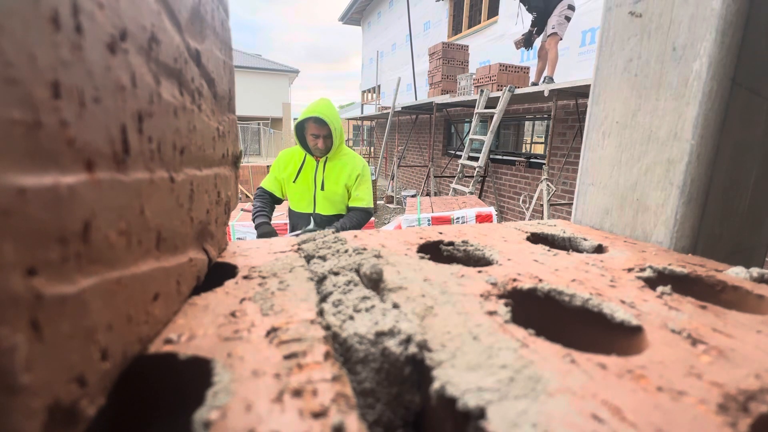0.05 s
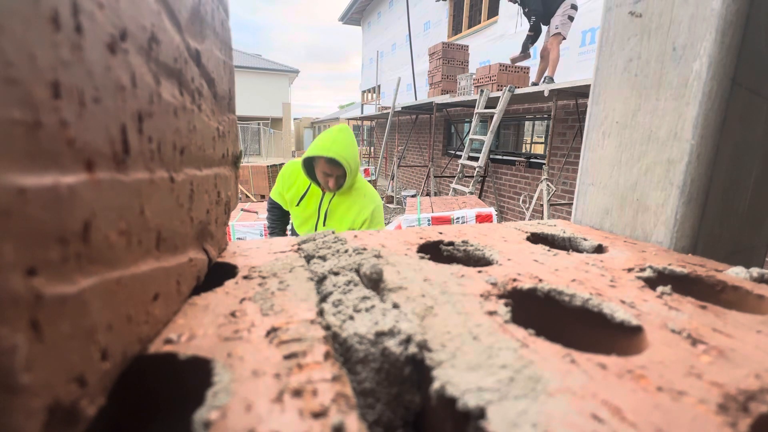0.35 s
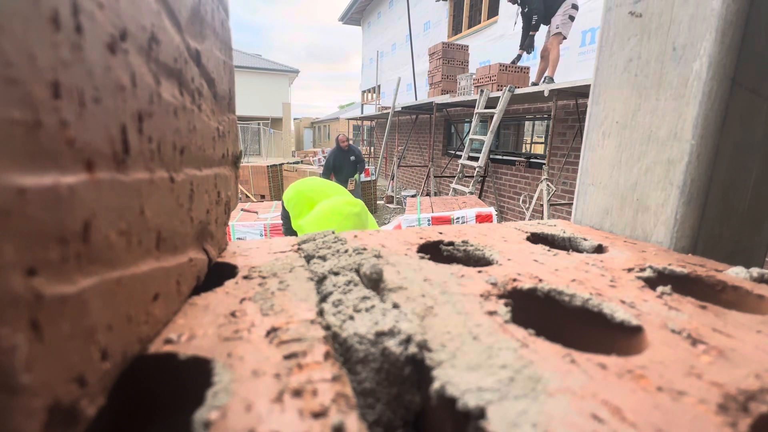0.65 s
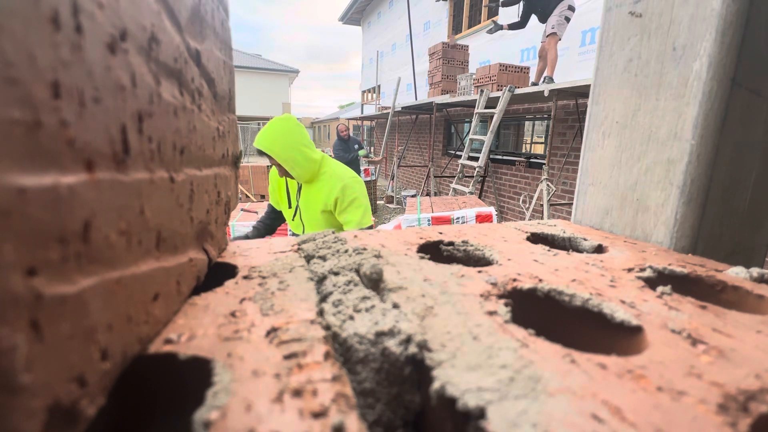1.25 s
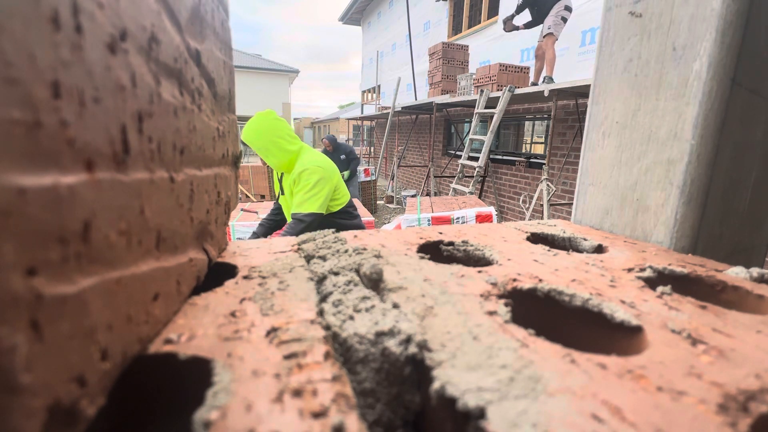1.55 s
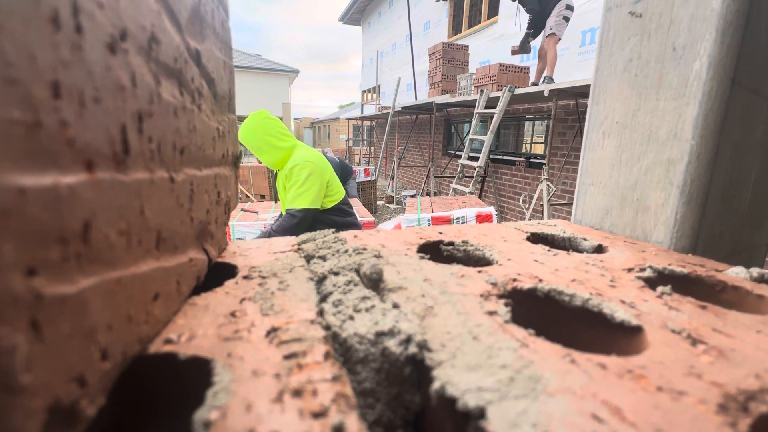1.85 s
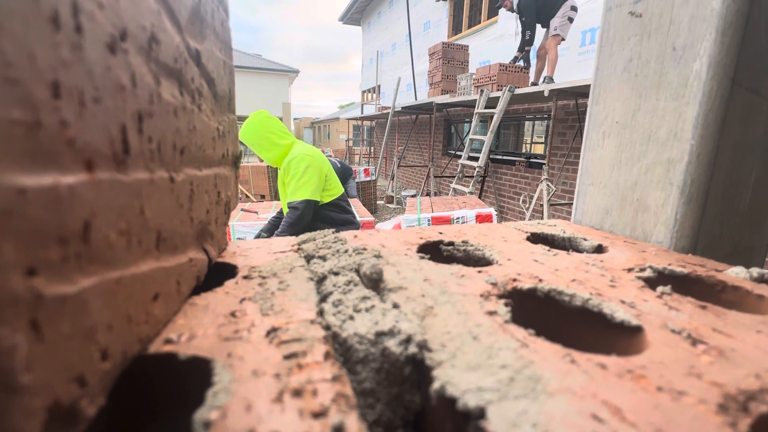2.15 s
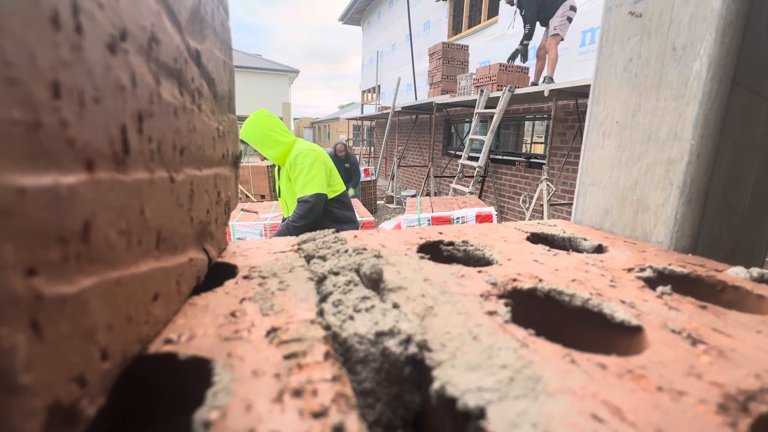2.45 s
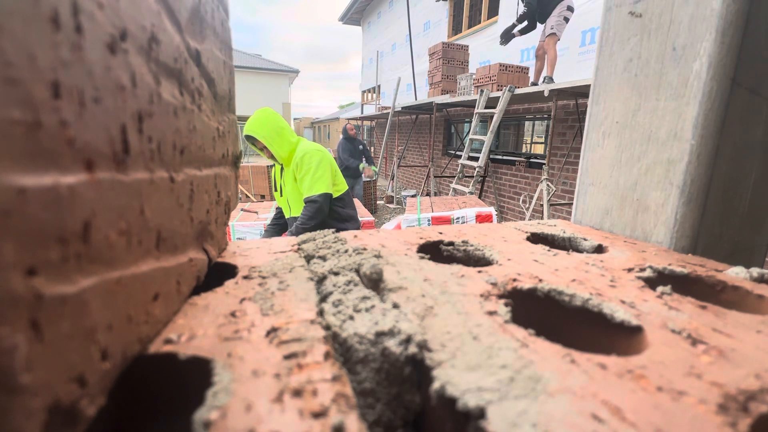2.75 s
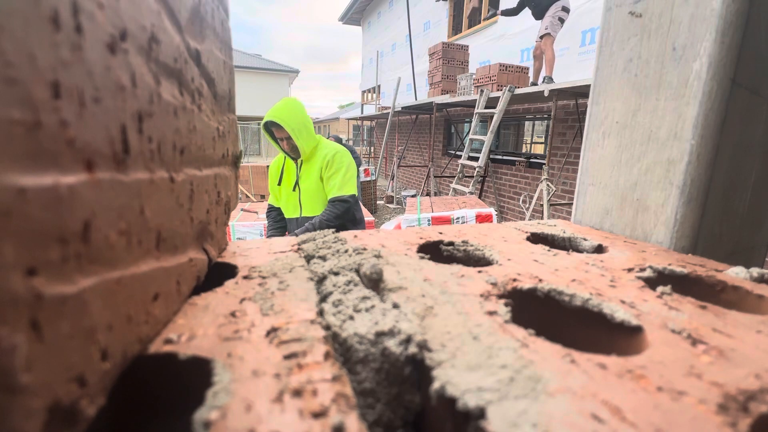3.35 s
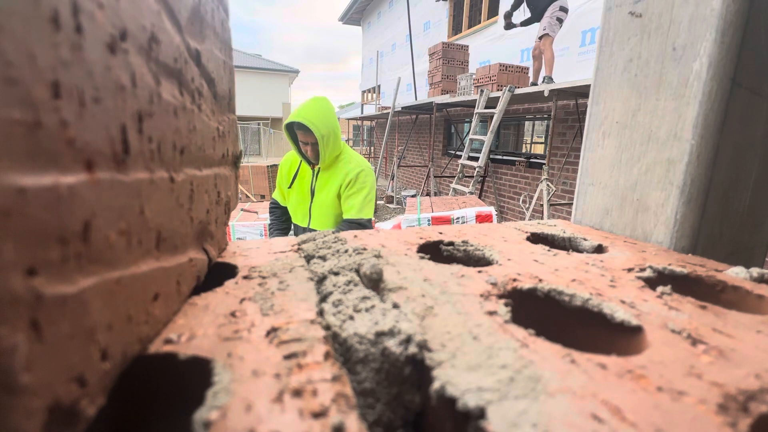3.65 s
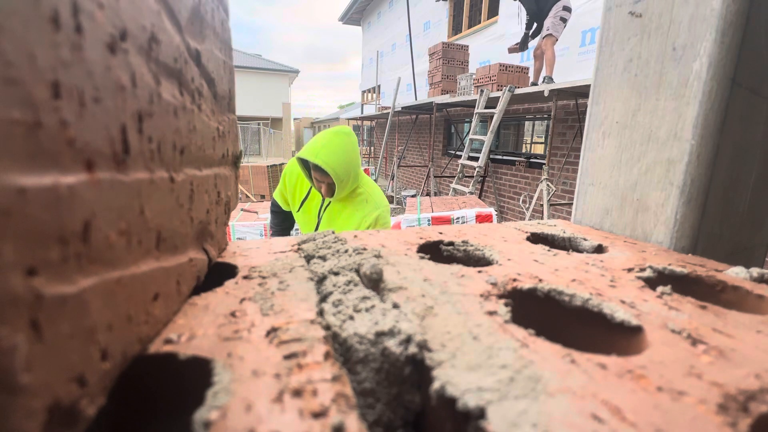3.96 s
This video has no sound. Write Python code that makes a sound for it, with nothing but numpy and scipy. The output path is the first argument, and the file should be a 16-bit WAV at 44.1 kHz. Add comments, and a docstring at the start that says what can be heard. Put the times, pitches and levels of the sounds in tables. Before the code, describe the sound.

Bricklaying sounds at a building site, over a distant mixer's hum. A steel tube rings at the start; around 0.7 seconds tools clatter, bricks bump and mortar crumbs tick. A trowel chops into mortar with hollow plops at 1.4, 1.9 and 2.5 seconds, scraping grittily between and chinking at 2.2. The hum fades, and two dull brick knocks land at 3.0 and 3.5 seconds, echoing briefly off the walls.

```python
"""Bricklaying, heard from a phone lying on a stack of bricks. Over a distant mixer's hum a steel tube
rings out and tools clatter; loose bricks bump and mortar crumbs tick. From 1.4 s a trowel chops into
mortar three times with hollow, falling plops, scraping through the sand in between and once chinking on
a brick. After 3 s, as the background sinks, two bricks are knocked down with damped, sagging notes.
The house walls answer each chop and knock with reverberation."""
import sys
import numpy as np
from scipy import signal
from scipy.fft import rfft, irfft
from scipy.io import wavfile
from scipy.ndimage import uniform_filter1d

SR = 44100
rng = np.random.default_rng(int(sys.argv[2]) if len(sys.argv) > 2 else 0)


def inscribe(sig):
    """Save sig as 16-bit PCM at rate SR to the path in sys.argv[1].

    A 1-D sig is mono; a 2-D sig holds one channel per row.
    Samples are clipped to [-1, 1] before scaling.
    """
    pcm = np.round(np.clip(np.atleast_2d(sig).T, -1, 1) * 32767)
    wavfile.write(sys.argv[1], SR, pcm.astype(np.int16))


N = 176400
T = np.arange(N) / SR
LEFT_LAG_S = 0.000677  # sound reaches the left microphone port late
PORT_LAGS_S = np.array([[LEFT_LAG_S], [0]])


def amp(db):
    """Amplitude ratio of a level in decibels."""
    return 10 ** (np.asarray(db) / 20)


def unit_rms(x):
    """Normalisation to unit mean power."""
    return x / np.sqrt(np.mean(x ** 2))


def on_log(points, hz):
    """Interpolation of (f/Hz, value) points on a logarithmic frequency axis."""
    f, values = np.array(points, float).T
    return np.interp(np.log(hz + 1), np.log(f), values)


def on_time(points):
    """Linear interpolation of (t/s, value) points over the scene."""
    return np.interp(T, *np.array(points).T)


def wander(rate_hz, size):
    """Low-pass noise: a smooth random fluctuation of unit rms."""
    span = max(int(SR / rate_hz), 1)
    return unit_rms(uniform_filter1d(uniform_filter1d(rng.standard_normal(size), span), span))


def decay(t, t60):
    """Exponential damping by 60 dB in t60 seconds."""
    return np.exp(-np.log(1000) * t / t60)


def pan(db):
    """Stereo gains for a level difference, left over right."""
    return amp(np.array([[db], [-db]]) / 2)


def add(out, start, sound):
    """Superposition of a sound from a start time in seconds."""
    i = max(int(start * SR), 0)
    out[:, i:i + sound.shape[1]] += sound[:, :N - i]


# resonances and notches of the hollows in the brick stack: f/Hz, width/Hz, gain/dB
HOLLOWS = [(160, 28, 2), (349.3, 6.9, 3), (442, 54, 4), (530, 33.4, 6), (562, 24.5, 6.5), (742.5, 30, 5),
           (1168, 7.3, -1.5), (1360, 20, 12.5), (1442, 37, 6.5), (1551, 120, 6.5), (1730, 13, 11),
           (2427, 20, 8.5), (2935, 4.3, -1.5), (3500, 6.9, -21)]
# likeness of left and right: f/Hz, coherence
COHERENCE = [(40, 0.21), (150, 0.53), (330, 0.65), (600, 0.58), (1500, 0.22), (4000, 0.034), (12000, 0.055)]
def noise(spectrum, size, lag=LEFT_LAG_S):
    """Partly coherent stereo noise of unit rms, coloured by cavity resonance among the bricks."""
    hz = np.fft.rfftfreq(size, 1 / SR)
    hollows_db = sum(db / (1 + (2 * (hz - f) / width) ** 2) for f, width, db in HOLLOWS)
    mid, side = rfft(rng.standard_normal((2, size))) * amp(on_log(spectrum, hz) + hollows_db)
    coherence = on_log(COHERENCE, hz)
    mid, side = mid * np.sqrt(1 + coherence), side * np.sqrt(1 - coherence)
    left = (mid + side) * np.exp(-2j * np.pi * hz * lag)
    return unit_rms(irfft(np.array([left, mid - side]), size))


def ringing(modes, roughness):
    """Free vibration in damped modes, each amplitude-modulated as the struck object chatters."""
    t, out = T[:SR], 0
    for hz, db, t60 in modes:
        flutter = 1 + roughness * np.array([wander(110, SR) for _ in range(2)])
        phase = 2 * np.pi * (hz * t + rng.random((2, 1)) / 3)
        out = out + amp(db) * flutter * np.sin(phase) * decay(t, t60)
    return out * np.minimum(t / 0.003, 1)


# spectra of the mixer's churning, its hum lines and the rumble: f/Hz, relative level/dB
CHURN_SPECTRUM = [(25, -21), (54, -37), (125, -6), (190, -4), (280, -0.5), (430, -1), (720, -3.5),
                  (1100, -14), (1450, -16), (1900, -16.5), (2500, -19), (7000, -34.5), (13000, -54),
                  (14500, -68), (16000, -83)]
HUM_LINES = [(62, -25), (124, -12.5), (184, -18), (248, -16.5), (312, -20)]
RUMBLE_SPECTRUM = [(20, -12), (40, -10), (62, 15.5), (90, 7), (150, 3), (400, -42.5)]
# envelopes of the mixer and the rumble: t/s, relative level/dB
MIXER_LEVEL = [(0, -36.5), (.55, -38), (1.0, -36.5), (1.3, -38), (1.6, -34.5), (2.1, -34), (2.5, -38.5),
               (2.95, -47), (3.35, -48), (3.75, -51), (4.0, -53)]
RUMBLE_LEVEL = [(0, 15.5), (1.2, 10), (1.5, -21), (2.0, 5.5), (2.8, 8.5), (3.3, 2), (4.0, 7.5)]
def mixer():
    """Machine noise: a near-harmonic line spectrum on broadband churning, over a low rumble."""
    churn = noise(CHURN_SPECTRUM, N) * amp(1.3 * wander(20, N))
    hum = 0
    for hz, db in HUM_LINES:
        amplitude = np.sqrt(2) * amp(db + 0.51 * wander(23, N))
        drifting_time = np.cumsum(1 + 0.0076 * wander(14.5, N)) / SR
        hum = hum + amplitude * np.sin(2 * np.pi * hz * (drifting_time - PORT_LAGS_S))
    rumble = np.array([noise(RUMBLE_SPECTRUM, N)[0] for _ in range(2)])
    rumble *= amp(-56.5 + on_time(RUMBLE_LEVEL) + wander(1.2, N))
    return ((churn + hum) * amp(on_time(MIXER_LEVEL)) + rumble) * pan(-3.5)


# spectrum of dry sand: f/Hz, relative level/dB
SAND_SPECTRUM = [(2000, -18), (6000, 5), (9500, -8), (12500, -4), (13600, -3), (14600, -24), (16000, -36)]
# envelope of its rustle: t/s, level/dB
SAND_LEVEL = [(0, -60), (.35, -72), (.55, -74), (.65, -59), (.68, -56), (.74, -58), (.85, -69), (.92, -62),
              (1.02, -73), (1.14, -58), (1.3, -79), (2.7, -82), (2.9, -65), (3.3, -85), (4.0, -90)]
def sand():
    """Randomly modulated noise: dry sand rustles faintly near the phone."""
    return noise(SAND_SPECTRUM, N) * amp(on_time(SAND_LEVEL) + 3 * wander(45, N))


# falling mortar crumbs: t/s, level/dB
CRUMBS = [(0.636, -42), (0.671, -36), (0.730, -48), (0.919, -51), (1.047, -50), (1.123, -40.5)]
# spectrum of one tick: f/Hz, relative level/dB
CRUMB_SPECTRUM = [(2000, 5), (6000, -1), (12500, -2), (14000, 1), (14800, -12), (16000, -27)]
def crumbs():
    """Brief impacts have broad spectra: dry mortar ticks on brick, leaving a faint tail."""
    out, t = np.zeros((2, N)), T[:SR // 4]
    envelope = np.exp(-t / 0.0028) + amp(-15.5) * np.exp(-t / 0.11)
    for at, db in CRUMBS:
        add(out, at, amp(db) * noise(CRUMB_SPECTRUM, len(t)) * envelope)
    return out


WALL_DELAY_S, ECHO_PAN_DB, EARLY_SHARE, EARLY_S = 0.0125, -1.7, 0.48, 0.026
BASS_HZ, MIDS_HZ, TREBLE_HZ = 257, 1720, 2300
# spectrum of the wall reflections: f/Hz, relative level/dB
WALL_SPECTRUM = [(40, -33), (110, -21.5), (200, -9.5), (260, -3.5), (350, 2), (540, 1), (740, 0.5),
                 (980, -10.5), (1400, -17), (1800, -15), (2300, -22), (3000, -25), (4500, -30.5),
                 (6500, -36), (9000, -45), (13000, -59.5), (14500, -56), (16000, -72)]
# reverberation time by band: f/Hz, T60/s
WALL_T60 = [(150, 0.95), (500, 0.61), (1500, 0.56), (5000, 0.54), (12000, 0.37)]
def wall_echo(bass_db, mids_db, treble_db, rise, hold):
    """Reverberation: dense reflections fall quickly at first, then dull as the treble dies sooner."""
    t, hz = T[:SR], np.fft.rfftfreq(SR, 1 / SR)
    low_shelf = bass_db / (1 + (hz / BASS_HZ) ** 4)
    mid_bell = mids_db / (1 + (np.log2((hz + 1) / MIDS_HZ) / 1.52) ** 4)
    high_shelf = treble_db * hz ** 2 / (hz ** 2 + TREBLE_HZ ** 2)
    spectrum = rfft(noise(WALL_SPECTRUM, SR)) * amp(low_shelf + mid_bell + high_shelf)
    age, tail = np.maximum(t - rise - hold, 0), 0
    centres, t60s = np.array(WALL_T60).T
    for share, t60 in zip(np.eye(len(centres)), t60s):
        band = irfft(spectrum * on_log(list(zip(centres, share)), hz), SR)
        tail = tail + band * decay(age, t60)
    early_fall = 1 - EARLY_SHARE + EARLY_SHARE * np.exp(-age / EARLY_S)
    onset_grain = np.exp(0.044 * wander(220, SR) * np.exp(-t / 0.018))
    return tail * np.minimum(t / rise, 1) * early_fall * onset_grain


# distant blows: t/s, level/dB, bass/dB, mids/dB, treble/dB, rise/s, hold/s, pan/dB
CLATTER = [(0.0, -27, -24, 0.5, 12, 0.00073, 0.07, -0.5), (0.47, -27, -9, -5, 2, 0.0033, 0.0026, -3.5),
           (.635, -20.5, -17, -10, 0.5, 0.016, 0.011, -1),
           (0.665, -11.5, -21, -1, -1.5, 0.0026, 0.0051, -0.5),
           (.682, -11, -8.5, 2, -13.5, 0.014, 0.04, -3.5), (1.047, -28, 3, -2, 9, 0.0013, 0.0019, -2.5),
           (1.124, -41, -7, -2, 30.5, 0.0035, 0.014, -3.5), (2.206, -18.5, 9.5, 1, 3, 0.014, 0.028, -2),
           (2.392, -26.5, -2.5, 1, -39, 0.018, 0.029, 1), (2.659, -36.5, 21, 3.5, 8.5, 0.013, 0.075, -1),
           (3.418, -42, 2, 4, 11, 0.0046, 0.07, -5)]
def clatter():
    """Indirect sound: bricks and tools handled out of sight arrive by reflection off the walls."""
    out = np.zeros((2, N))
    for at, db, *tone_db, rise, hold, pan_db in CLATTER:
        add(out, at, amp(db) * wall_echo(*tone_db, rise, hold) * pan(pan_db))
    return out


# modes of a steel tube, and of the trowel tapping a brick: f/Hz, relative level/dB, T60/s
TUBE_MODES = [(510, 3, 0.4), (540, -2.5, 0.66), (790, -3, 0.38), (1060, -23, 0.37), (1378, -18, 1),
              (1625, -16.5, 1), (2090, -15.5, 0.47), (2470, -22.5, 0.82), (3220, -21.5, .8),
              (4320, -22, 0.4), (4414, -29, 0.77)]
CHINK_MODES = [(2040, -2, .06), (2330, -6, .09), (2519, -10, .2), (2730, -5, .16), (2794, 0, .22),
               (2860, -4, .17)]
def clinks():
    """Modal ringing of struck steel: a tube, then the trowel, which skids off in a falling chirp."""
    out, t = np.zeros((2, N)), T[:SR]
    add(out, 0, amp(-24.5) * ringing(TUBE_MODES, roughness=0.089) * pan(1.7))
    start_hz, end_hz, glide_s = 2190, 986, 0.016
    hz = end_hz + (start_hz - end_hz) * np.exp(-(t / glide_s) ** 2)
    envelope = np.minimum(t / 0.003, 1) * np.exp(-(t / glide_s / 2) ** 2)
    chirp = np.sin(2 * np.pi * np.cumsum(hz) / SR) * envelope
    add(out, 2.203, amp(-29.5) * ringing(CHINK_MODES, roughness=0.6) + amp(-33) * chirp)
    return out


# collisions of loose bricks: t/s, level/dB, f/Hz
BUMPS = [(0.678, -11, 696), (0.698, -1, 506), (0.722, -7, 430), (0.757, -10, 531), (0.840, -23, 450)]
def bumps():
    """Heavy damping: bricks bump as they are picked up, in short notes with an inharmonic overtone."""
    out, t = np.zeros((2, N)), np.maximum(T[:SR // 4] - PORT_LAGS_S, 0)
    envelope = np.minimum(t / 0.0025, 1) * np.exp(-t / 0.01)
    for at, db, hz in BUMPS:
        phase = 2 * np.pi * hz * t
        note = np.sin(phase) + amp(-21) * np.sin(3.3 * phase)
        add(out, at, amp(db) * note * envelope * pan(1.5))
    return out


GRAINS_PER_S, GAP_WIDTH_HZ = 900, 59
# resonances of the blade: f/Hz, width/Hz, relative level/dB
BLADE_MODES = [(1340, 84, -18), (1550, 29, 1.5), (2030, 100, 7.5), (2290, 32, 1.5), (2840, 21, -2.5),
               (3135, 28, -3), (3410, 27, -3), (3700, 22, -6), (4940, 67, -10), (5800, 56, -5)]
# resonance of the gap under the blade, sinking as each push loads it: t/s, f/Hz
GAP_PITCH = [(1.70, 1420), (1.75, 1570), (1.80, 1335), (1.848, 1490), (1.89, 1320), (1.91, 1220),
             (2.1, 1495)]
def rasp():
    """Impulse excitation: sand grains ring the blade's fixed resonances and the gap's moving one."""
    grains = (rng.random(N) < GRAINS_PER_S / SR) * rng.uniform(-0.93, 1, (3, N))
    grains = grains[:2] + grains[2]  # the third row is common to both channels
    t = T[:SR // 20]
    response = sum(amp(db) * np.sin(2 * np.pi * hz * t) * np.exp(-np.pi * width * t)
                   for hz, width, db in BLADE_MODES)
    blade = signal.fftconvolve(grains, response[None], axes=1)[:, :N]
    # a one-pole filter in a rotating frame is a resonator of moving pitch
    rotation = np.exp(2j * np.pi * np.cumsum(on_time(GAP_PITCH)) / SR)
    pole = np.exp(-np.pi * GAP_WIDTH_HZ / SR)
    gap = (rotation * signal.lfilter([1], [1, -pole], grains / rotation)).imag
    return amp(-3.5) * unit_rms(blade) + amp(-4.5) * unit_rms(gap)


# a long stroke, then a light sandy one: t/s, body level/dB, rasp level/dB, hiss level/dB
STROKES = [(1.59, -64, -74, -72), (1.628, -38, -71, -47), (1.668, -29.5, -40.5, -39.5),
           (1.732, -26, -33.5, -32.5), (1.748, -36, -31, -32), (1.776, -35, -42, -29.5),
           (1.794, -24, -30, -31), (1.848, -31, -25.5, -37), (1.862, -23, -31, -38),
           (1.891, -25, -27.5, -41), (1.901, -22.5, -34, -45), (1.912, -21, -20.5, -46),
           (1.925, -59, -64, -63), (2.11, -76, -66, -78), (2.16, -38, -50, -51), (2.21, -39, -38, -45),
           (2.3, -51, -57, -45.5), (2.4, -50, -71, -57), (2.45, -63, -70, -55.5), (2.5, -72, -73, -63)]
# spectra of the blade's body and the gritty hiss: f/Hz, relative level/dB
BODY_SPECTRUM = [(100, 1.5), (300, 3.5), (500, 4.5), (750, 7.5), (1000, -5), (1450, -9.5), (2000, -8.5),
                 (3300, -13), (4500, -24), (9000, -25), (15000, -68)]
GRIT_SPECTRUM = [(800, 0), (2200, -0.5), (4200, 5), (6500, 3), (8500, -2), (10500, -9.5), (13200, -3),
                 (14300, -26), (16000, -56)]
def scrape():
    """Friction noise: the blade hisses through sandy mortar; rasp and body surge as it loads up."""
    times, *levels = np.array(STROKES).T
    body_gain, rasp_gain, hiss_gain = (amp(np.interp(T, times, db, left=-120, right=-120))
                                       for db in levels)
    body = noise(BODY_SPECTRUM, N, lag=0) * body_gain
    hiss = noise(GRIT_SPECTRUM, N, lag=0) * hiss_gain
    direct = body + hiss + rasp() * rasp_gain
    direct *= np.exp(0.17 * np.tanh((wander(860, N) + wander(63, N)) / 2))  # roughness
    walls = noise([(100, 5.5), (5000, 12), (12000, -8)], SR) * decay(T[:SR], t60=0.5)
    reflected = signal.fftconvolve(direct, unit_rms(walls) / np.sqrt(SR), axes=1)[:, :N]
    return direct + amp(-11) * reflected


KNOCK_RISE_S, KNOCK_SAG_S, KNOCK_LAG_S = 0.0024, 0.0033, 0.00015
# modes of the stack and of the struck brick: f/Hz, relative level/dB, T60/s
STACK_MODES = [(186, -28, 0.8), (244, -10, 0.15), (342, -22.5, 0.48)]
BRICK_MODES = [(1380, -28, 0.27), (1540, -28, 0.22), (1850, -32, 0.14)]
# brick knocks: t/s, level/dB, first f/Hz, last f/Hz, decay/s, overtone/dB,
# echo level/dB, echo bass/dB, echo mids/dB, echo treble/dB
KNOCKS = [(3.0376, 0, 623, 343, 0.0087, -37, -16.5, 10.5, 7, 2.5),
          (3.4731, -2.5, 410, 316, 0.0078, 1, -18, 11.5, 9, 6.5)]
def knocks():
    """Impact excitation: a gritty crack and a note that sags as the brick seats; brick and stack ring."""
    out, t = np.zeros((2, N)), T[:SR]
    for at, db, first_hz, last_hz, decay_s, overtone_db, echo_db, *tone_db in KNOCKS:
        hz = last_hz + (first_hz - last_hz) * np.exp(-t / KNOCK_SAG_S)
        phase = 2 * np.pi * (np.cumsum(hz) / SR - last_hz * np.array([[KNOCK_LAG_S], [0]]))
        damping = np.exp(-t / decay_s)
        note = np.sin(phase) + amp(overtone_db) * np.sin(1.89 * phase) * damping
        body = amp(db) * note * np.minimum(t / KNOCK_RISE_S, 1) * damping
        grit = noise(BODY_SPECTRUM, SR) + amp(-19.5) * noise(GRIT_SPECTRUM, SR)
        crack = amp(-19) * grit * np.exp(-t / 0.01)
        stack = sum(amp(db + mode_db) * np.sin(2 * np.pi * f * t) * decay(t, t60)
                    for f, mode_db, t60 in STACK_MODES)
        add(out, at, (body + crack) * pan(0.5) + stack * np.minimum(t / 0.011, 1))
        add(out, at + 0.014, amp(db) * ringing(BRICK_MODES, roughness=0.45))
        echo = wall_echo(*tone_db, rise=0.015, hold=0.012)
        add(out, at, amp(echo_db) * echo * pan(ECHO_PAN_DB))
    return out


CHOP_END_HZ, FALL_S, FALL_LAG_S, CHOP_DECAY_S, SNAP_S = 285, 0.0016, 0.0017, 0.0041, 0.00079
THUD_HZ, THUD_S, PUFF_HZ, PUFF_S, PUFF_LAG_S = 221, 0.009, 35.5, 0.014, 0.0099
# partials of the blade cutting in, and spectrum of the snap: f/Hz, relative level/dB
BLADE_PARTIALS = [(1190, -19.5), (1480, -45), (3100, -36), (5450, -39), (6350, -39)]
SNAP_SPECTRUM = [(60, -22), (400, 3.5), (1200, -0.5), (3000, -9), (6000, -11.5), (12000, -15), (16000, -21)]
# trowel chops: t/s, level/dB, first f/Hz, swell/s, snap/dB, air puff/dB,
# echo level/dB, echo bass/dB, echo mids/dB, echo treble/dB
CHOPS = [(1.3621, -2, 795, 0.0051, -27, -30, -16.5, 10, 2.5, 1.5),
         (1.9169, -3, 760, 0.0076, -15, -24.5, -15, -15, -0.5, 5.5),
         (2.5131, -2, 756, 0.0049, -16, -53, -20, 12, 6.5, 11.5)]
def chops():
    """A gliding resonance swells as the blade closes on mortar, snaps and falls; thud and puff follow."""
    out, t = np.zeros((2, N)), T[:SR // 2] - 0.1  # the blade closes at t = 0
    before, after, puff_age = np.maximum(-t, 0), np.maximum(t, 0), np.maximum(t - PUFF_LAG_S, 0)
    fall = (1 - np.tanh((t - FALL_LAG_S) / FALL_S / 2)) / 2
    ring = sum(amp(db) * np.sin(2 * np.pi * hz * t) for hz, db in BLADE_PARTIALS)
    ring *= np.exp(-after / SNAP_S)
    thud = amp(-17) * np.sin(2 * np.pi * THUD_HZ * after) * np.exp(-after / THUD_S)
    puff_hz = PUFF_HZ * np.array([[1], [1.3]])  # higher on the right
    puff = 2 * np.sin(2 * np.pi * puff_hz * puff_age) * np.exp(-puff_age / PUFF_S)
    for at, db, first_hz, swell_s, snap_db, puff_db, echo_db, *tone_db in CHOPS:
        hz = CHOP_END_HZ + (first_hz - CHOP_END_HZ) * fall
        phase = 2 * np.pi * np.cumsum(hz) / SR
        plop = np.sin(phase - phase[np.argmin(abs(t))])
        swells = swell_s * np.array([[1], [0.12]])  # more abrupt on the right
        envelope = np.exp(-before / swells - after / CHOP_DECAY_S)
        friction = amp(-13.5) * noise(BODY_SPECTRUM, len(t), lag=0)
        note = (plop + ring + friction) * envelope * pan(3)
        snap = noise(SNAP_SPECTRUM, len(t), lag=0) * np.exp(-abs(t) / SNAP_S)
        add(out, at + t[0], amp(db) * (note + thud) + amp(snap_db) * snap + amp(puff_db) * puff)
        echo = wall_echo(*tone_db, rise=0.0026, hold=0.0093)
        add(out, at + WALL_DELAY_S, amp(echo_db) * echo * pan(ECHO_PAN_DB))
    return out


def scene():
    """Linear superposition of all the sources on the site."""
    return chops() + knocks() + clatter() + bumps() + clinks() + scrape() + crumbs() + sand() + mixer()


def record(dry):
    """Soft saturation and band limiting: the phone rounds the loudest peaks and cuts the top."""
    rounded = dry / (1 + dry ** 6) ** (1 / 6)
    low_pass = signal.ellip(8, 0.2, 70, 15900, fs=SR, output="sos")
    return signal.sosfilt(low_pass, rounded)


dry = scene()
out = record(dry)
inscribe(out)
```